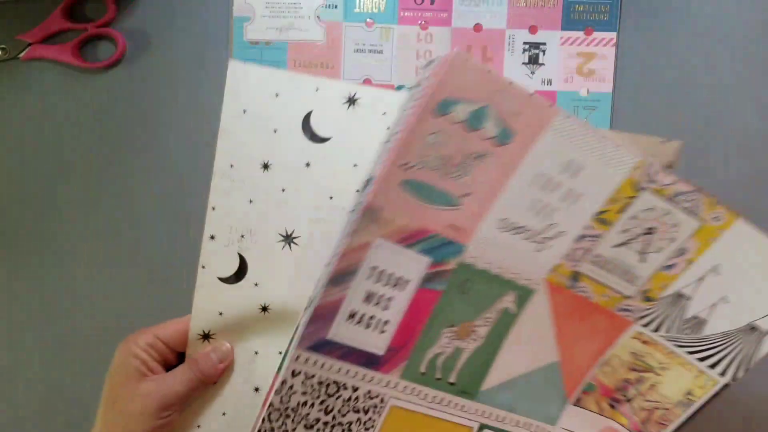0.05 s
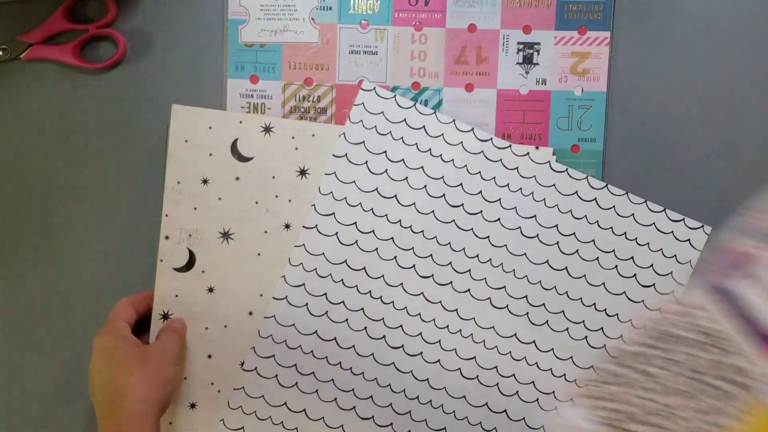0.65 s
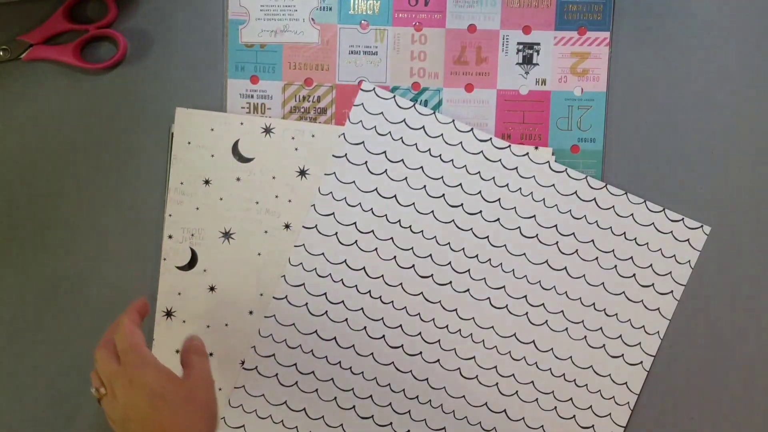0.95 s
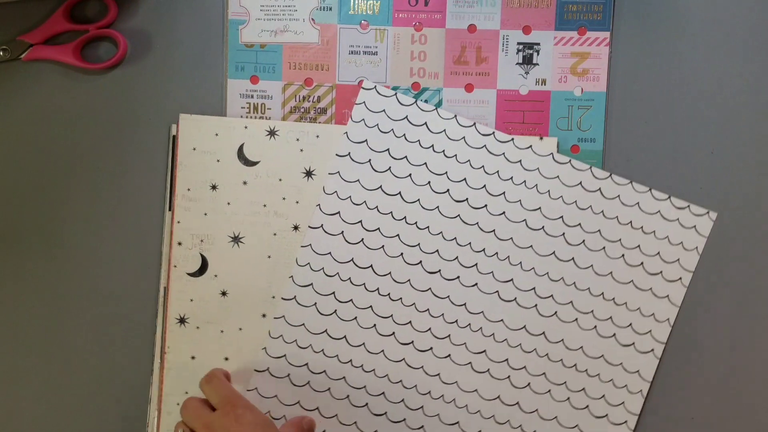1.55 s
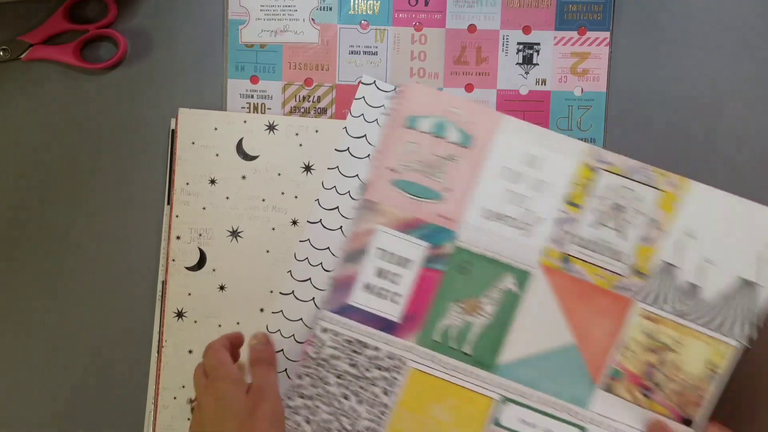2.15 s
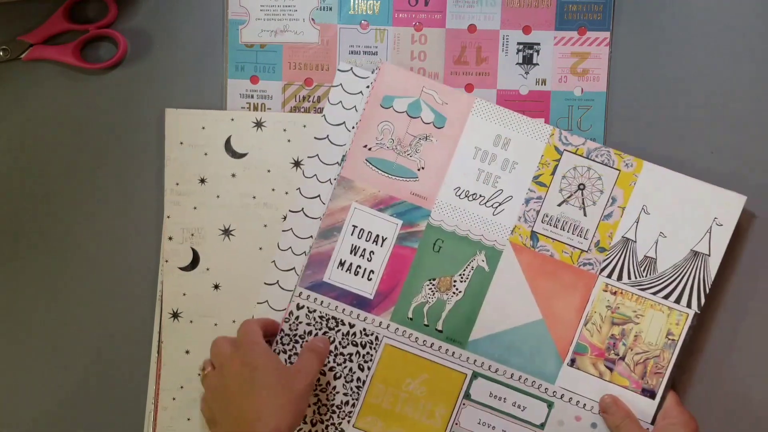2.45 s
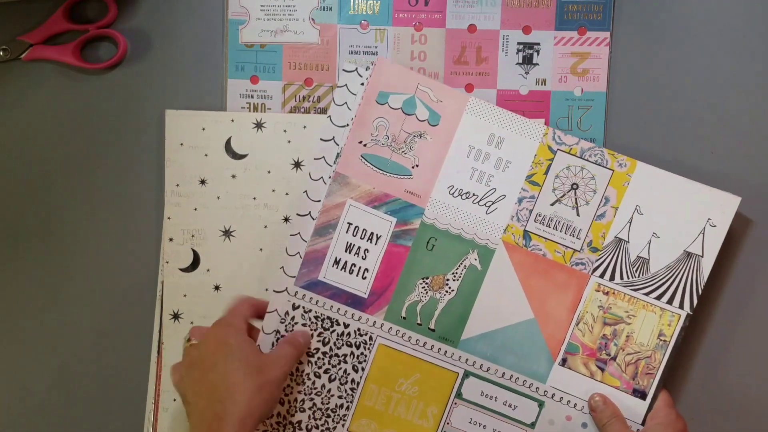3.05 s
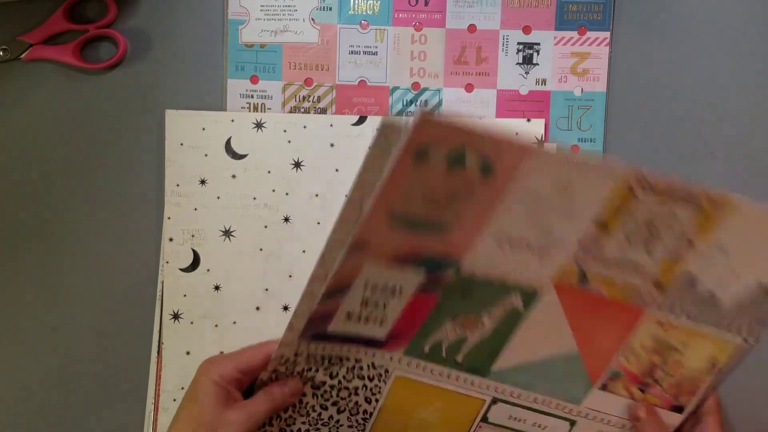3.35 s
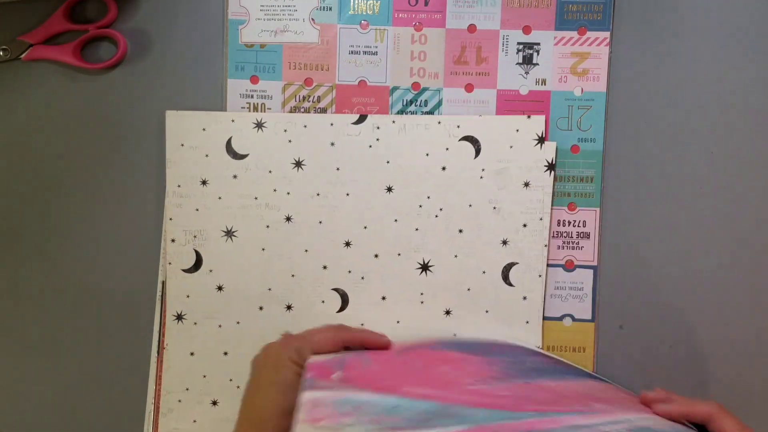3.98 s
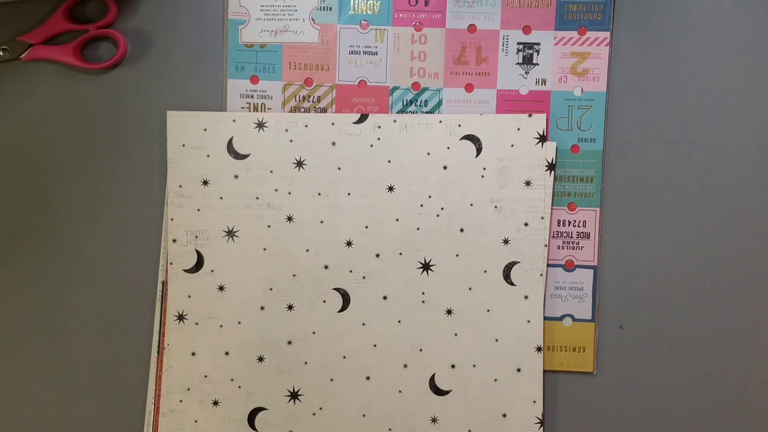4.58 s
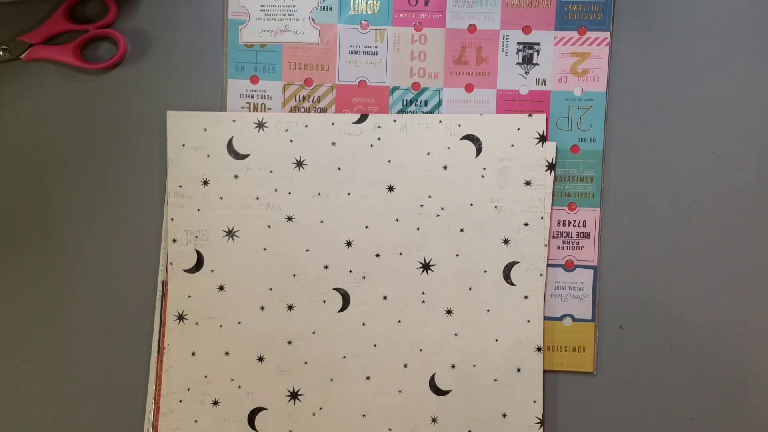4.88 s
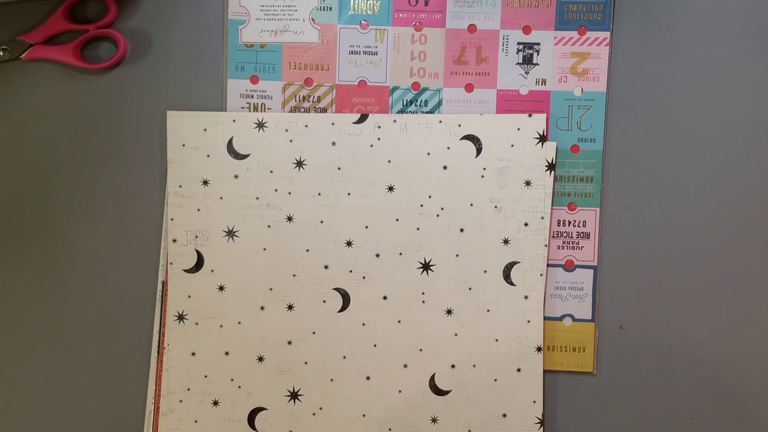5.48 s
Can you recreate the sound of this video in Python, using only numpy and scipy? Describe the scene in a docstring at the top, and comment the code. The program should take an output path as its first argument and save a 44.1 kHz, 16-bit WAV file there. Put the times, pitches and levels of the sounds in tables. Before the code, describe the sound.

In a small, quiet room, close pops and a papery hiss come from stiff sheets being pulled apart. Light slides, crinkles and flicking edges follow as the paper is collected, with one sharper pop and a puff of air as it flexes. Near the end, several knocks and a loud slap sound just to the right as the stack lands on a hard surface.

```python
"""Soft pops and a grainy hiss come first: stiff sheets of paper are slid apart in a small room.
The sheets rub and crinkle as they are gathered and lifted off a table. They pop when they buckle,
puff out air when they fall and flick their edges past each other. Then the bundle is set down
to the right with a few knocks and one loud slap. The room's air murmurs quietly throughout."""
import sys
import numpy as np
from scipy import signal
from scipy.fft import rfft, irfft, next_fast_len
from scipy.io import wavfile

SR = 44100
rng = np.random.default_rng(int(sys.argv[2]) if len(sys.argv) > 2 else 0)


def pcm_store(signal):
    """Save signal as 16-bit PCM."""
    levels = np.round(np.clip(np.atleast_2d(signal), -1, 1) * 32767)
    wavfile.write(sys.argv[1], SR, levels.astype(np.int16).T)


N = 247958
SHORT = 16384  # samples in one short sound
AGE = np.arange(SHORT) / SR  # seconds since a short sound began
TIME = np.arange(N) / SR


def amp(db):
    """Turn decibels into a number to multiply by."""
    return 10 ** (np.asarray(db) / 20)


def value_at(points, hz):
    """Look up any frequency in a table, joining its points on a log axis."""
    known_hz, values = np.transpose(points)
    return np.interp(np.log(np.maximum(hz, 1)), np.log(known_hz), values)


def colour(x, points):
    """Make each frequency louder or softer as a table says."""
    size = 2 * next_fast_len(x.shape[-1])
    gain = amp(value_at(points, np.fft.rfftfreq(size, 1 / SR)))
    cepstrum = irfft(np.log(gain))
    # fold the filter so that nothing sounds ahead of its time
    cepstrum[1:size // 2] *= 2
    cepstrum[size // 2 + 1:] = 0
    return irfft(rfft(x, size) * np.exp(rfft(cepstrum)))[..., :x.shape[-1]]


def unit(x):
    """Scale to an average energy of one per channel."""
    return x / np.sqrt(np.sum(x ** 2) / (x.size / x.shape[-1]))


def burst(x, db):
    """Set a short sound's level as if all its energy fell within 30 ms."""
    return unit(x) * amp(db) * np.sqrt(.03 * SR)


def steady(x, db):
    """Set a long sound's average (rms) level."""
    return x * amp(db) / np.sqrt(np.mean(x ** 2))


def wobble(per_s):
    """A random curve that wanders above and below zero by about one."""
    turns = rng.standard_normal(2048)
    return np.interp(TIME * per_s, np.arange(len(turns)), turns)


def lean(pair, points):
    """Tip each frequency left or right by a table of left minus right dB."""
    return np.array([colour(x, [(hz, side * db / 2) for hz, db in points])
                     for x, side in zip(pair, (1, -1))])


# how much left and right differ in scattered sound: frequency_hz, side_minus_mid_db
STEREO_WIDTH = [(60, -15), (200, -11.5), (400, -13.5), (700, -6.5), (1300, -1.5), (4000, 0.5), (15000, 0)]
def wide_noise(size):
    """Stereo noise: left and right are alike in the bass, unrelated in the treble."""
    mid, side = rng.standard_normal((2, size))
    return mid + np.array([[1], [-1]]) * colour(side, STEREO_WIDTH)


def grains(size, uneven_db):
    """Countless paper fibres catch, some harder than others, making a grainy noise."""
    catches = np.repeat(rng.standard_normal(size // 32 + 1), 32)[:size]
    return wide_noise(size) * amp(uneven_db * catches)


# a hand pushes one sheet over another: start_s, length_s, hiss_db, rasp_db, drum_db
STROKES = [(-0.04, 0.23, -54.5, -51.5, -49.5), (0.155, .21, -59, -53.5, -48.5),
           (0.37, 0.094, -60.5, -56.5, -65), (0.45, 0.43, -78, -63, -66),
           (1.344, 0.037, -59.5, -55.5, -59.5), (1.39, 0.14, -65.5, -64.5, -60.5),
           (1.554, 0.21, -72, -73, -71), (2.09, 0.066, -56.5, -55, -61), (2.16, 0.089, -62.5, -66, -60.5),
           (2.333, 0.053, -64.5, -66, -56.5), (2.61, 0.13, -63, -58, -53), (2.73, 0.079, -68, -66, -60),
           (2.85, 0.034, -55, -51.5, -63.5), (2.912, 0.035, -64, -54, -49.5),
           (2.981, 0.12, -59, -56, -60.5), (3.12, .34, -58, -58, -61), (3.249, 0.05, -51, -43, -45.5),
           (3.465, 0.077, -68.5, -65, -57), (3.567, 0.26, -59, -62, -65), (3.714, 0.069, -49, -54, -43),
           (3.789, 0.12, -57, -57, -65), (3.904, 0.17, -70.5, -68, -71), (4.044, .18, -59, -63.5, -60),
           (4.146, 0.035, -58.5, -71, -46.5), (4.229, 0.066, -82, -71, -53), (4.348, 0.18, -62.5, -66, -64),
           (4.557, 0.098, -66, -75, -71), (4.695, 0.058, -91, -80, -44.5), (4.862, 0.074, -85, -73, -51.5),
           (5.146, 0.094, -67, -85, -77)]
def stroke_levels(rest_db=(-84, -78, -71), swell_share=0.29, sag_db_per_s=10.5, coast_s=0.027):
    """Hiss, rasp and drum levels in dB: each push swells, slackens and coasts to a stop."""
    power = amp(rest_db)[:, None] ** 2 * np.ones(N)  # held sheets still stir faintly
    for start_s, length_s, *levels_db in STROKES:
        age = np.maximum(TIME - start_s, 0)
        speed = np.minimum(age / (swell_share * length_s), 1) * amp(-sag_db_per_s * age)
        speed *= np.exp(-np.maximum(age - length_s, 0) / coast_s)
        power += (amp(levels_db)[:, None] * speed) ** 2
    return 10 * np.log10(power) + 0.93 * wobble(per_s=30)  # the hand's speed wavers


# the tone of hissing faces, rasping edges and a drumming sheet: frequency_hz, level_db
FACE_HISS = [(1000, -28), (2500, 0.5), (4100, 2), (5200, -1.5), (6700, -1.5), (8300, 1), (9700, -5.5),
             (12000, 0), (14400, 3), (15800, 1.5)]
EDGE_RASP = [(400, -20), (900, -6.5), (1500, 1), (2600, 0.5), (3600, -7), (6000, -19.5)]
SHEET_DRUM = [(60, -12.5), (150, 0), (350, 6), (650, 6.5), (1100, -14.5), (2200, -32.5)]
def sliding(hiss_db, rasp_db, drum_db, echo_s=0.00091, echo_gain=0.4):
    """Faces hiss, edges rasp and the sheet drums, all catching and slipping together."""
    grip_db = 2.0 * wobble(per_s=110)
    faces = steady(colour(grains(N, uneven_db=2.5), FACE_HISS), hiss_db + 0.81 * grip_db)
    edges = steady(colour(grains(N, uneven_db=2.5), EDGE_RASP), rasp_db + grip_db)
    sheet = steady(colour(grains(N, uneven_db=2.5), SHEET_DRUM), drum_db + 2 * grip_db)
    rub = faces + edges + sheet
    # the table's echo comes later or sooner as the sheet rises and sinks
    delay_s = echo_s * np.exp(0.23 * wobble(per_s=5))
    echo = np.array([np.interp(TIME - delay_s, TIME, x) for x in rub])
    return (rub + echo_gain * echo) / np.hypot(1, echo_gain)


# the tone of a crease giving way: frequency_hz, level_db
CRINKLE_TONE = [(500, -40), (1500, -15), (4500, -3), (8300, -11), (10000, -9.5), (15500, -7)]
def crinkles(hiss_db, per_s=50, uneven_db=4.0):
    """Tiny creases and edges give way at random, ticking 9 dB below the hiss."""
    gives_way = rng.random(N) < per_s / SR
    strength = amp(uneven_db * np.minimum(rng.standard_normal(N), 2))
    catches = signal.fftconvolve(gives_way * strength, np.exp(-AGE / 0.0016))[:N]
    ticks = colour(wide_noise(N) * catches, CRINKLE_TONE)
    return steady(ticks, hiss_db - 9)


# the tone of the room's air: frequency_hz, level_db
AIR_TONE = [(25, -16), (50, -7.5), (85, 2), (120, 0), (165, -6.5), (240, -5), (360, -2), (480, -25),
            (800, -13.5), (1900, -17.5), (3500, -27), (6500, -33), (10000, -36), (15500, -26)]
def room_air(level_db=-62.5):
    """The air in the room makes a quiet, nearly steady murmur."""
    return steady(colour(wide_noise(N), AIR_TONE), level_db + 0.47 * wobble(per_s=6))


def sheet_band(force, hz, low, high):
    """A sheet gives off only a broad band of sound, from low to high times its pitch."""
    cut_bass = signal.butter(2, hz * low, "high", fs=SR, output="sos")
    cut_treble = signal.butter(4, hz * high, "low", fs=SR, output="sos")
    return signal.sosfilt(np.vstack([cut_bass, cut_treble]), force)


def add(track, start_s, sound):
    """Mix a short sound in at a given time."""
    start = int(start_s * SR)
    track[:, start:start + SHORT] += sound[..., :N - start]


# the tone of crunching fibres: frequency_hz, level_db
CRACKLE_TONE = [(250, -0.5), (700, 4.5), (1400, 6.5), (2600, -5), (4500, -8.5), (6700, -15.5),
                (8200, -10.5), (9800, -18), (14000, -16.5), (15800, -16)]
def crackle(level_db, fade_s, uneven_db, rise_s, tick):
    """A brief tick at first contact, then the bright, quickly fading crunch of fibres."""
    contact = (1 - np.exp(-AGE / rise_s)) * (np.exp(-AGE / fade_s) + tick * np.exp(-AGE / 0.00073))
    return burst(colour(grains(SHORT, uneven_db) * contact, CRACKLE_TONE), level_db)


# a sheet buckles or is tapped: start_s, level_db, pitch_hz, flutter_over_pulse_db, crackle_db
POPS = [(0.000, -41.5, 255, -10, -55), (0.022, -28.5, 294, -10, -69), (0.0559, -42, 744, 8, -68),
        (0.0659, -35, 1000, 7, -50.5), (0.0802, -36, 275, -3.5, -43.5), (0.0854, -32.5, 630, 0.5, -44),
        (0.245, -41.5, 1140, -0.5, -77), (0.281, -46.5, 626, -3, -60), (0.3214, -25.5, 697, -6, -48.5),
        (0.545, -58, 500, -2, -63), (0.641, -47.5, 197, 1, -64), (1.380, -53, 630, 3, -56),
        (1.4918, -55, 840, -7, -54.5), (1.545, -45.5, 660, 3, -57), (2.097, -56.5, 810, 14, -59),
        (2.215, -57, 237, 9, -64), (2.311, -50, 320, -2, -59), (2.379, -60, 280, 0, -62),
        (2.6761, -40.5, 310, -7.5, -53), (2.829, -60, 1070, 12, -51.5), (2.8782, -40.5, 795, 3, -43.5),
        (2.9234, -40, 765, 2.5, -47), (3.059, -75, 597, -4, -59.5), (3.075, -60.5, 640, -3, -54.5),
        (3.224, -51, 670, 1, -60), (3.252, -49, 433, 4, -72), (3.266, -44, 2220, 20, -54),
        (3.291, -46, 2200, 7, -54), (3.312, -47.5, 454, 4, -72), (3.353, -49.5, 2160, 5, -68),
        (3.367, -47.5, 2150, 3, -59), (3.482, -54, 314, 2, -61.5), (3.506, -50, 327, 1, -77),
        (3.7249, -37.5, 546, 1.5, -42.5), (3.7294, -27.5, 375, 5, -34), (3.7722, -38.5, 600, -1.5, -57),
        (3.8899, -51.5, 750, 4, -66), (3.893, -40, 321, 6, -78), (3.936, -51, 534, 2, -70),
        (4.072, -55.5, 326, 9, -65), (4.152, -43, 415, 1, -62), (4.303, -51.5, 426, 7, -79)]
def pops(echo_s=0.00328, echo_gain=0.37):
    """A buckling sheet sends out one pulse, echoed by the table, then flutters at its pitch."""
    track = np.zeros((2, N))
    snap = np.zeros(SHORT)
    snap[[0, int(echo_s * SR)]] = 1, echo_gain
    for start_s, level_db, pitch_hz, flutter_db, crackle_db in POPS:
        fade_s = 0.01 * (500 / pitch_hz) ** 0.32  # higher flutters die sooner
        shake = grains(SHORT, uneven_db=0) * np.exp(-AGE / fade_s) * (1 - np.exp(-AGE / 0.00061))
        bending = signal.lfilter(*signal.iirpeak(pitch_hz, Q=1.8, fs=SR), shake)
        shake = unit(shake) + amp(-1) * unit(bending)
        pulse, flutter = (unit(sheet_band(x, pitch_hz, low=0.79, high=1.23)) for x in (snap, shake))
        pop = burst(pulse + amp(flutter_db) * flutter, level_db)
        crunch = crackle(crackle_db, 1.11 * fade_s, uneven_db=3.5, rise_s=0.00015, tick=1.0)
        add(track, start_s, pop + crunch)
    return track


# air squeezed from under a falling sheet: start_s, level_db, pitch_hz
PUFFS = [(0.024, -39, 81), (0.079, -40.5, 61.6), (0.646, -46.5, 62), (2.218, -49.5, 97), (2.679, -53.5, 70),
         (3.723, -38, 58), (3.726, -33, 115), (3.772, -43, 68), (3.814, -48.5, 80), (3.892, -43.5, 84),
         (5.408, -42, 51.6)]
def puffs(fade_cycles=0.35):
    """A cushion of air escapes with a low thump that dies almost at once."""
    track = np.zeros((2, N))
    for start_s, level_db, pitch_hz in PUFFS:
        push = np.exp(-AGE * pitch_hz / fade_cycles) * (1 - np.exp(-AGE / 0.005))
        swing = np.sin(2 * np.pi * pitch_hz * AGE) * push
        add(track, start_s, burst(sheet_band(swing, pitch_hz, low=1.0, high=3.6), level_db))
    return track


# an edge slips off another sheet: start_s, level_db, fade_s
FLICKS = [(0.407, -41.5, 0.014), (1.342, -65, 0.032), (2.096, -56.5, 0.066), (4.163, -53, 0.014),
          (4.676, -45, 0.0072), (5.342, -51, 0.056)]
# the tone of its scrape: frequency_hz, level_db
SCRAPE_TONE = [(500, -20), (1800, 6), (4400, 0), (5900, 10), (7000, 4), (8300, 8), (9800, -1.5), (11000, 7),
               (14800, 8), (15600, 1.5)]
def flicks():
    """A freed edge scrapes over the sheet below: a sudden hiss that dies as it slows."""
    track = np.zeros((2, N))
    for start_s, level_db, fade_s in FLICKS:
        speed = (1 - np.exp(-AGE / 0.0025)) * np.exp(-AGE / fade_s)
        scrape = colour(grains(SHORT, uneven_db=1.5) * speed, SCRAPE_TONE)
        add(track, start_s, burst(scrape, level_db))
    return track


# the notes of the surface under the bundle: pitch_hz, level_db
SURFACE_NOTES = [(165, -3), (225, -2), (291, 4.5), (400, 7), (492, -16), (584, -5), (643, 5), (754, -3),
                 (872, -16), (1103, -16), (1201, -21), (1390, 7.5), (1677, 6), (1777, 10.5), (1958, 2.5),
                 (2333, 1), (2660, 8), (2898, 7)]
def surface_ring(fade_60db_s=0.09):
    """The struck surface rings; its higher notes reach left and right out of step."""
    ring = 0
    for pitch_hz, level_db in SURFACE_NOTES:
        phase = rng.uniform(0, 2 * np.pi) + min(pitch_hz / 800, 1.5) * rng.standard_normal((2, 1))
        ring = ring + amp(level_db) * np.sin(2 * np.pi * pitch_hz * AGE + phase)
    return ring * amp(-60 * AGE / fade_60db_s)


# the bundle lands on a hard surface: start_s, level_db, pitch_hz, settle_s, crackle_db
KNOCKS = [(4.678, -38.5, 457, 0.017, -39.5), (4.767, -32, 795, 0.01, -78), (4.796, -39, 760, 0.01, -79),
          (4.827, -33, 724, 0.026, -83), (5.347, -32, 455, 0.12, -44.5), (5.379, -19, 376, 0.0045, -33.5),
          (5.3842, -20.5, 970, 0.0061, -30.5), (5.385, -20, 347, 0.0085, -43),
          (5.395, -17.5, 298, 0.017, -35), (5.506, -26, 460, 0.016, -48), (5.577, -47, 213, 0.03, -85)]
# the balance of a sound off to the right: frequency_hz, left_minus_right_db
FROM_THE_RIGHT = [(200, -2), (500, 1.5), (1100, -3), (2200, -0.5), (8000, -0.5), (14000, 0)]
def knocks(left_delay_s=0.00018, ring_db=-5):
    """Off to the right, many sheet edges land one after another and set the surface ringing."""
    track = np.zeros((2, N))
    for start_s, level_db, pitch_hz, settle_s, crackle_db in KNOCKS:
        landing = (1 - np.exp(-AGE / 0.0027)) * np.exp(-(AGE / settle_s) ** 1.19)
        force = grains(SHORT, uneven_db=3.5) * landing
        shake = surface_ring() * (1 - np.exp(-AGE / (0.85 * settle_s)))
        thud, ring = (unit(sheet_band(x, pitch_hz, low=0.54, high=1.465)) for x in (force, shake))
        knock = burst(thud + amp(ring_db) * ring, level_db)
        crunch = crackle(crackle_db, settle_s, uneven_db=0.5, rise_s=0.0032, tick=0.46)
        add(track, start_s, knock + crunch)
    late_left = np.interp(TIME - left_delay_s, TIME, track[0])
    return lean([late_left, track[1]], FROM_THE_RIGHT)


# how long the room's echoes last: frequency_hz, fade_60db_s
ROOM_FADE = [(100, 0.29), (400, 0.1), (1500, 0.12), (6000, 0.073), (15000, 0.11)]
def room(x, echo_db):
    """Add the echoes of a small furnished room, where the bass lingers longest."""
    hz, age, bands = signal.stft(wide_noise(SHORT), SR, nperseg=256)
    fade = amp(-60 * age / value_at(ROOM_FADE, hz)[:, None])
    tail = signal.istft(bands * fade, SR)[1][:, :SHORT]
    tail *= np.clip((AGE - .004) / 0.00088, 0, 1)  # the first echo takes 4 ms
    return x + amp(echo_db) * signal.fftconvolve(x, unit(tail), axes=1)[:, :N]


def scene():
    """The paper on the table is close; the bundle lands further away, with more echo."""
    hiss_db, rasp_db, drum_db = stroke_levels()
    paper = pops() + puffs() + flicks() + sliding(hiss_db, rasp_db, drum_db) + crinkles(hiss_db)
    return room(paper, echo_db=-10) + room(knocks(), echo_db=-7) + room_air()


# the balance of the two microphones: frequency_hz, left_minus_right_db
MIC_BALANCE = [(100, 1), (500, -0.5), (1200, -0.5), (4000, -2.5), (8000, -2.5), (14000, -0.5)]
def record(dry, top_hz=15800):
    """The right microphone is a little brighter, and the highest treble is cut."""
    cut_treble = signal.ellip(12, .2, 80, top_hz, fs=SR, output="sos")
    return signal.sosfilt(cut_treble, lean(dry, MIC_BALANCE))


dry = scene()
out = record(dry)
pcm_store(out)
```